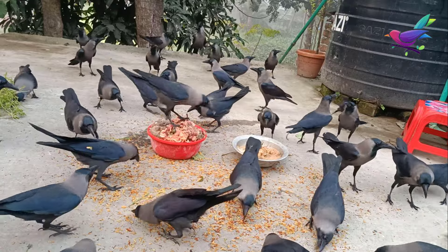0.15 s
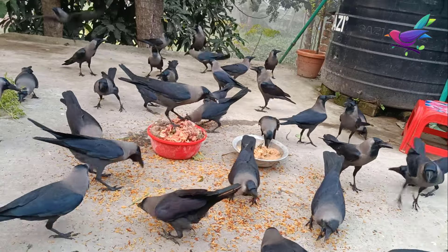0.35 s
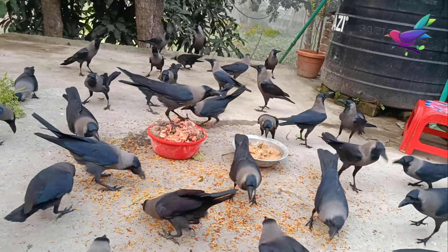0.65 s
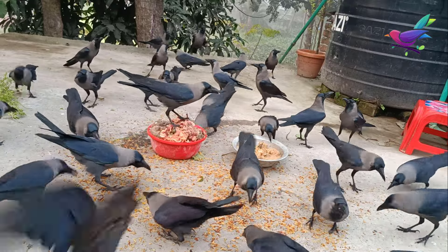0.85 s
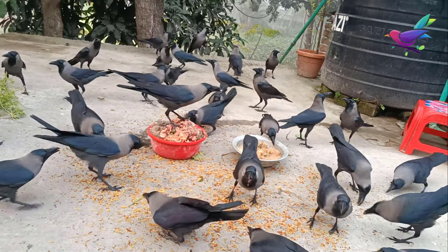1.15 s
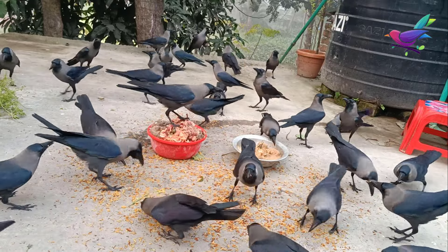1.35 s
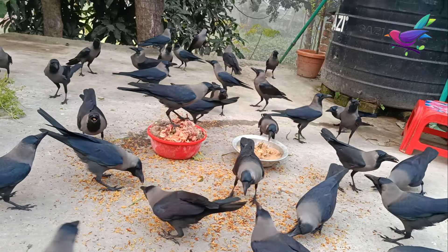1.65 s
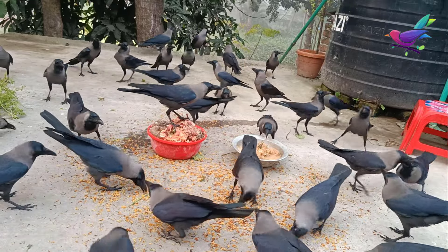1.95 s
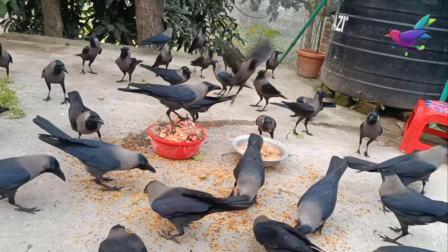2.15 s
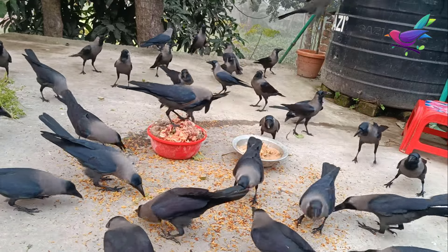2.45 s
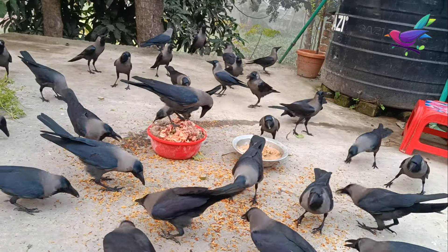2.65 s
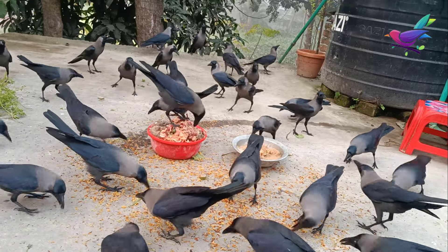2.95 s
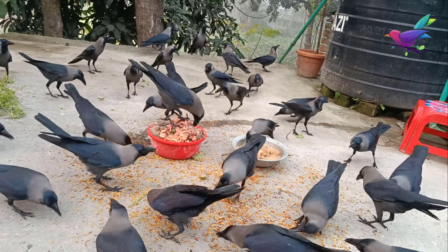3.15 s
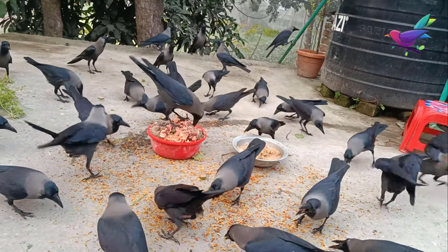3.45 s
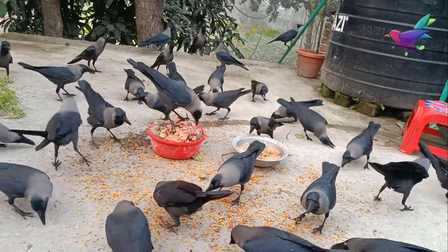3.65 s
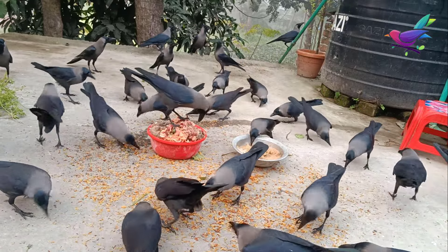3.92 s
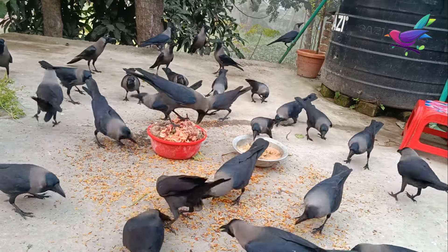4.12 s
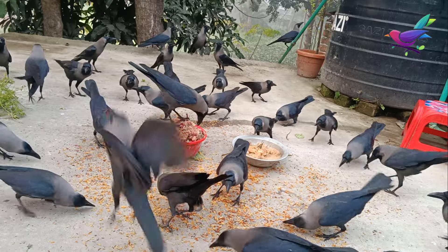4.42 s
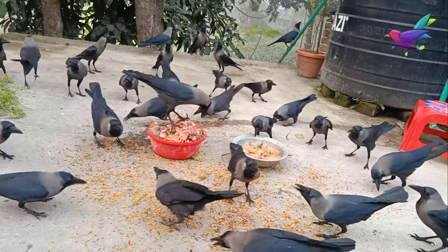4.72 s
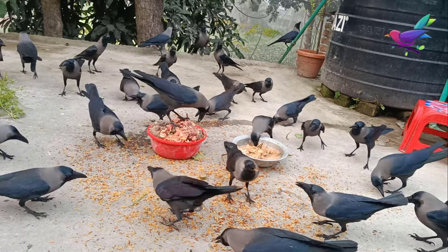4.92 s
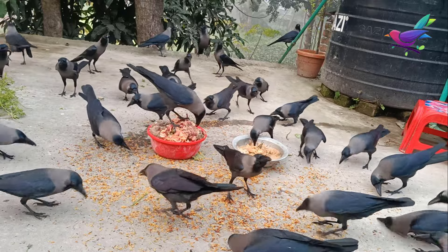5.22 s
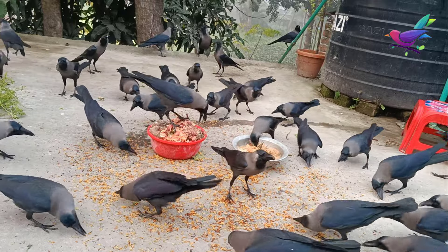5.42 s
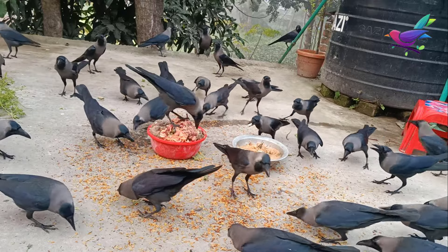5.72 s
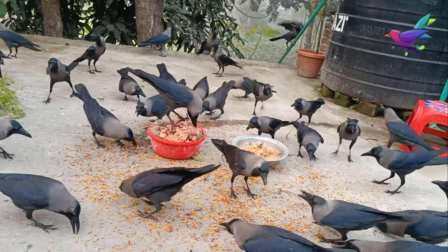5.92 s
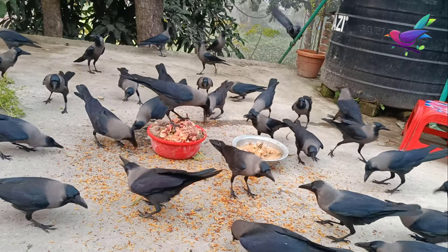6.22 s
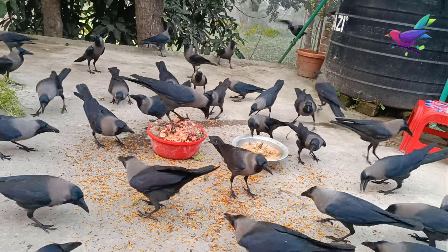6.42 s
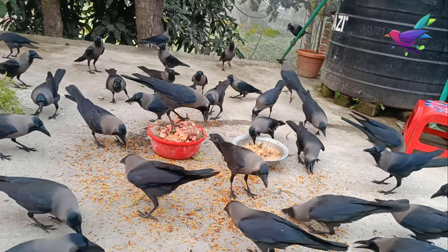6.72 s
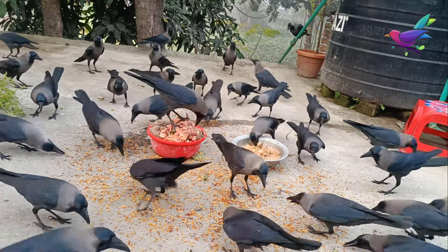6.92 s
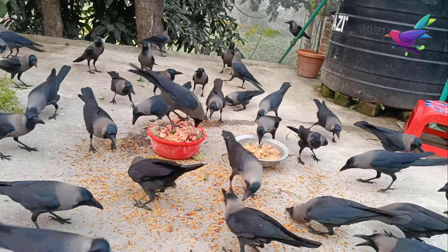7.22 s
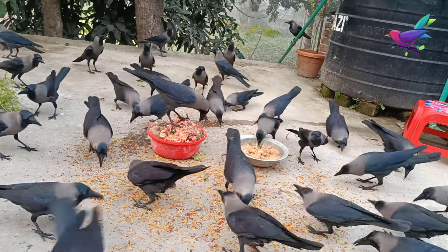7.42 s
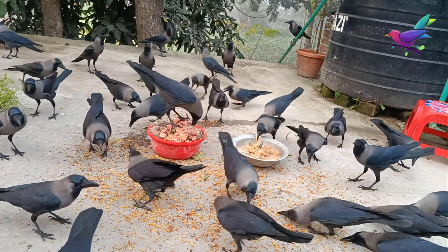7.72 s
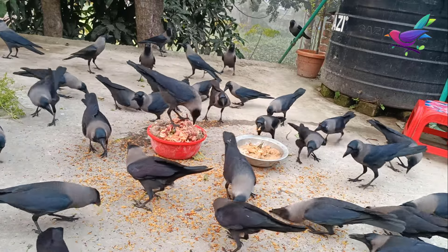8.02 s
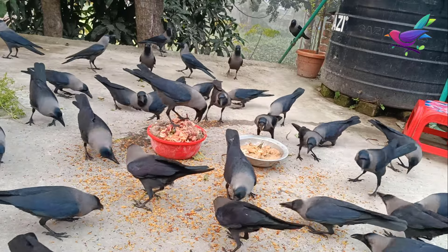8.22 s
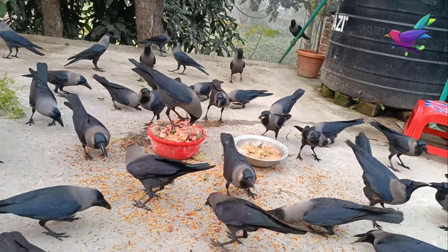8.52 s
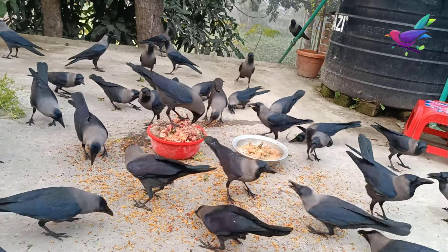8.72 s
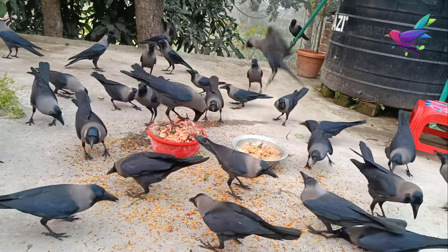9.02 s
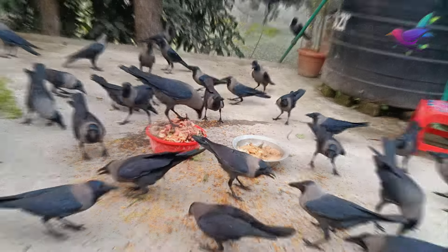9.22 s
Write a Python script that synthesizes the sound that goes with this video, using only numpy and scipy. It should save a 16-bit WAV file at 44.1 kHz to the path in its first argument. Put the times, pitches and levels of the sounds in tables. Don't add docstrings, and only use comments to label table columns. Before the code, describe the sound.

A crowd of crows caws harshly and hoarsely over each other in a yard, with wing thumps, small knocks and beak ticks.

```python
import sys
import numpy as np
from scipy import signal
from scipy.fft import rfft, irfft
from scipy.io import wavfile
from scipy.ndimage import uniform_filter1d

SR = 44100
rng = np.random.default_rng(int(sys.argv[2]) if len(sys.argv) > 2 else 0)


def master_out(mix):
    frames = np.transpose(np.atleast_2d(mix))
    ceiling = np.clip(frames, -1, 1)
    pcm = np.round(ceiling * 32767).astype(np.int16)
    wavfile.write(sys.argv[1], SR, pcm)


def decibels_to_gain(level_db):
    exponent = np.asarray(level_db, float) / 20
    return 10 ** exponent


N = 413216
TIME = np.arange(N) / SR


def unit(x):
    return x / np.sqrt(np.mean(x ** 2))


def walk(count, rate):
    k = int(SR / rate) + 1
    steps = np.repeat(rng.standard_normal(count // k + 1), k)[:count]
    return unit(uniform_filter1d(steps, k))


def colour(x, points):
    hz, db = np.transpose(points)
    bins_hz = np.arange(N // 2 + 1) * SR / N
    return irfft(rfft(x) * decibels_to_gain(np.interp(np.log(bins_hz + 1), np.log(hz), db)), N)


def band(x, lo_hz, hi_hz, order=4):
    return signal.sosfiltfilt(signal.butter(order, [lo_hz, hi_hz], "band", fs=SR, output="sos"), x)


def swell(x, db, hold_s):
    running = np.sqrt(uniform_filter1d(np.mean(x, axis=0) ** 2, int(hold_s * SR)) + 1e-12)
    return x * decibels_to_gain(db) / running


def add(out, sound, at_s, late_ms, pan_db):
    for side, sign in enumerate((1, -1)):
        i = int((at_s + sign * late_ms / 2000) * SR)
        part = sound[max(-i, 0):max(N - i, 0)]
        out[side, max(i, 0):max(i, 0) + len(part)] += part * 2 / (1 + decibels_to_gain(-sign * pan_db))


# frequency in Hz, level in dB per Hz.
YARD = [(15, -35), (25, -0.5), (193, -8), (322, -14.5), (399, -13), (871, -16), (2630, -26), (12800, -40),
        (15500, -64)]


def yard():
    mid, side = rng.standard_normal((2, N))
    side = band(side, 560, 19000, order=1)
    air = unit(colour(np.array([mid + side, mid - side]), YARD))
    return air * decibels_to_gain(-43.5 + 2.5 * walk(N, 8))


# start in seconds, length in seconds, level in dB, # share above 150 Hz in
# dB, left minus right in dB.
GUSTS = [(0.544, 0.034, -41.5, -32.5, 7), (0.937, 0.036, -43.5, -11, 0), (1.33, 0.069, -30.5, -2, 3),
         (1.557, 0.048, -17.5, -1, 18), (1.645, 0.12, -21, -9, 6.5), (1.923, .02, -28, -8.5, -10),
         (2.126, 0.15, -20.5, -4.5, 21), (2.346, 0.21, -28, -38, -7), (2.797, 0.079, -35.5, -9, -4),
         (3.974, 0.044, -30.5, -38, -25), (4.214, 0.034, -28.5, -39, 0), (4.407, 0.19, -26, -49, -19),
         (4.69, 0.035, -37, 4, -5), (5.914, 0.0045, -17.5, -2, 36), (5.975, .02, -24.5, -6.5, 30),
         (6.03, .05, -23, -8, 30), (6.124, 0.087, -29, -2, 11), (7.097, 0.12, -42.5, 2, -4),
         (.33, .1, -43, -3, 0), (0.676, .06, -44, -2.5, -2), (1.78, 0.074, -35, -11, 0),
         (3.116, 0.14, -45, -7, -4), (3.525, .06, -41.5, -4.5, -1), (4.532, 0.056, -31.5, -3.5, -10),
         (6.618, 0.06, -45, -10, 0), (8.0, 0.075, -51, -3, -2), (8.694, 0.018, -52, -31, -4)]


def gusts():
    rise_db_per_s, fall_db_per_s = 242, 149
    breeze_db, breeze_knock_db = -60, -1
    lumps = decibels_to_gain(4.9 * np.array([walk(N, 30), walk(N, 30)]))
    rumble = unit(band(lumps * rng.standard_normal((2, N)), 26, 72.4, order=1))
    thumps = unit(band(lumps ** 1.79 * rng.standard_normal((2, N)), 91, 308, order=2))
    power = np.full((2, N), decibels_to_gain(2 * breeze_db) / 2)
    sharp = power * decibels_to_gain(2 * breeze_knock_db)
    for start, length_s, db, knock_db, pan_db in GUSTS:
        before_db = rise_db_per_s * (start - TIME)
        after_db = fall_db_per_s * (TIME - start - length_s)
        fade_db = np.maximum(before_db, after_db).clip(0)
        left = 1 / (1 + decibels_to_gain(-2 * pan_db))
        push = decibels_to_gain(2 * (db - fade_db)) * np.array([[left], [1 - left]])
        power = power + push
        sharp = sharp + push * min(decibels_to_gain(2 * knock_db), .9)
    both = np.sqrt(power - sharp) * rumble + np.sqrt(sharp) * thumps
    return swell(both, 10 * np.log10(power.sum(axis=0)), hold_s=0.074)


# time in seconds, pitch in Hz, level in dB.
WHISTLES = [
    [(6.71, 3760, -60), (6.78, 3680, -56), (6.86, 3730, -54), (6.9, 3690, -62)],
    [(7.0, 2930, -64), (7.025, 3060, -60), (7.055, 2980, -64)],
    [(7.095, 3180, -56), (7.13, 3090, -60), (7.22, 3090, -63)],
    [(7.125, 3020, -58), (7.15, 2870, -54), (7.19, 2760, -54), (7.24, 2820, -58)],
    [(7.92, 3250, -54), (7.955, 2950, -56)],
    [(8.02, 3300, -55), (8.05, 3000, -57)],
    [(5.97, 2500, -69), (6.1, 3400, -68)],
    [(5.89, 2950, -73), (6.02, 3400, -72)],
    [(8.59, 3900, -52), (8.627, 4040, -43), (8.643, 3350, -45), (8.66, 2870, -45), (8.71, 2700, -50)],
    [(9.0, 3480, -60), (9.04, 3640, -58), (9.07, 3720, -47), (9.088, 3400, -45), (9.105, 2850, -48),
     (9.155, 2650, -52)],
]


def songbird():
    out = np.zeros((2, N))
    for note in WHISTLES:
        s, hz, db = np.transpose(note)
        t = np.arange(s[0], s[-1], 1 / SR)
        edge = np.minimum(np.minimum(t - s[0], s[-1] - t) / 0.0025, 1)
        pitch_hz = np.interp(t, s, hz) * (1 + .007 * walk(SR, 120)[:len(t)])
        level_db = np.interp(t, s, db) + 4 * walk(SR, 70)[:len(t)]
        tone = np.sin(np.cumsum(pitch_hz) * 2 * np.pi / SR) * decibels_to_gain(level_db) * edge
        add(out, tone * decibels_to_gain(7.5), s[0], 0, 0)
        add(out, tone * decibels_to_gain(-6), s[0] + .009, -.3, 0)
    return out


# start in seconds, length in seconds, centre in Hz, level in dB, left minus right in dB.
SWISHES = [(1.866, 0.22, 10800, -42.5, 20), (3.398, .12, 12000, -46, 5), (4.46, 0.079, 11000, -47, 0),
           (4.76, 0.14, 9850, -42, 6), (5.977, 0.055, 6000, -67, -4), (6.025, 0.035, 7040, -58, -13),
           (6.905, 0.04, 1610, -40, -2), (6.902, 0.058, 8000, -45, 0), (4.677, 0.14, 900, -37, 4),
           (5.227, .02, 1500, -49, 0), (6.121, 0.043, 2500, -39, -7), (7.013, 0.017, 2000, -51, 0),
           (7.068, 0.052, 1500, -39, -2), (8.472, 0.029, 4350, -42, -8), (6.88, .015, 3000, -44, 0),
           (9.04, 0.11, 12000, -60, 0)]


def wings():
    out = np.zeros((2, N))
    for at_s, length_s, centre_hz, db, pan_db in SWISHES:
        count = int(length_s * SR)
        rough = rng.standard_normal(SR // 2) * decibels_to_gain(4.3 * walk(SR // 2, 142))
        air = unit(band(rough, 0.12 * centre_hz, 1.05 * centre_hz, order=2))
        stroke = np.sin(np.pi * (np.arange(count) / count) ** 0.73)
        add(out, decibels_to_gain(db) * air[:count] * stroke, at_s, .1, pan_db)
    return out


# start in seconds, peak in dB, left minus right in dB.
KNOCKS = [(0.799, -29, -5), (1.35, -29, -1), (1.478, -29, -4), (1.689, -32, 2), (1.725, -34, 0),
          (2.83, -33, -3), (3.125, -31, -1), (3.165, -37, 0), (6.399, -42, 0), (7.27, -36, 0),
          (4.718, -37, 10), (5.226, -57, 0.5), (5.891, -26.5, 34), (5.919, -32, 28), (6.129, -37.5, -6),
          (7.021, -54, -2.5), (7.075, -44, -6)]


def knocks():
    out, t = np.zeros((2, N)), np.arange(4000) / SR
    for at_s, db, pan_db in KNOCKS:
        push = (1 - np.exp(-t / 0.0015)) * np.exp(-t / .012)
        blow = band(rng.standard_normal(len(t)) * push, 316, 770, order=2)
        add(out, decibels_to_gain(db + 7.0) * blow / blow.max(), at_s, 0, pan_db)
    return out


# start in seconds, peak in dB, lower band above it in dB,
# left minus right in dB.
PECKS = [(1.8836, -33, -7, 6.5), (3.656, -51.5, 15, -15), (4.298, -52, -1, -5), (4.488, -42, 1, -5),
         (4.6649, -34.5, -42, -0.5), (4.7681, -54, 2, 6.5), (4.775, -58, -6, 9), (4.786, -37, -11, -9),
         (5.1335, -50, 0, 1.5), (5.9673, -59, 3, -1), (5.996, -49.5, 4, -3), (6.054, -43, -8, 6),
         (6.0975, -53, -9, 3), (6.6347, -43.5, 1, -1.0), (6.915, -52.5, 8, -14), (6.9556, -36.5, -14, 11),
         (7.0645, -49, -6, 2), (7.1172, -56, 5, -2.5), (7.1297, -37, -7, -12), (7.289, -40, -8, -2),
         (7.7772, -32.5, -21, 1), (8.0072, -37, -7, -5), (8.485, -42, -3.5, -16), (8.6235, -34, -12, 11),
         (9.0663, -40, -4, -0.5), (9.149, -53, 5, -3)]


def pecks():
    out, t = np.zeros((2, N)), np.arange(900) / SR
    for at_s, db, low_db, pan_db in PECKS:
        crack = rng.standard_normal(len(t)) * (np.exp(-t / 0.00082) + 0.41 * np.exp(-t / 0.017))
        high = band(crack, 7900, 15200, order=2)
        low = band(crack, 4830, 7400, order=2)
        tick = high / high.max() + decibels_to_gain(low_db + 14.5) * low / low.max()
        add(out, decibels_to_gain(db - 0.5) * tick, at_s, 0, pan_db)
    return out


OVERTONES_DB = [-26.5, -3, 0, 5.5, -0.5, 2]


def caw(length_s, top_hz, sag, hoarse, ring):
    count = int(length_s * SR)
    u = np.arange(count) / count
    flutter, drift, jitter = (hoarse * walk(SR, rate)[:count] for rate in (60, 30, 700))
    arch = 1 - .18 * np.exp(-u / .12) - sag * u ** 1.6 - .45 * np.exp((u - 1) / .04)
    arch /= arch.max()
    flap_hz = rng.uniform(69, 79) * arch ** .5 * (1 + .04 * flutter)
    flap = np.cumsum(flap_hz) * 2 * np.pi / SR
    slack = min(4 * hoarse, 1)
    bend = slack * .045 * np.sin(flap + 1)
    hz = top_hz * arch * (1 + bend + .012 * drift + .011 * jitter)
    phase = np.cumsum(hz) * 2 * np.pi / SR

    overtones = np.arange(1, 28)[:, None]
    uneven_db = np.minimum(0.29 * overtones, 2) * rng.standard_normal(overtones.shape)
    strength_db = np.interp(overtones, np.arange(6) + 1, OVERTONES_DB) + uneven_db
    for at_hz, db, width_hz in zip(ring[::2], ring[1::2], (306, 450, 290)):
        strength_db = strength_db + db * np.exp(-((overtones * top_hz - at_hz) / width_hz) ** 2)
    opening = 1 + np.where(overtones < 7, .72, .35) * slack * np.sin(flap)
    waves = np.cos(overtones * phase + 7 * rng.random(overtones.shape))
    tone = np.sum(opening * decibels_to_gain(strength_db) * waves, axis=0)
    breath = .2 * hoarse * rng.standard_normal(SR)[:count]
    effort = decibels_to_gain(-2.5 * (2 * u - 1) ** 2)
    edges = np.minimum(u / 0.026, 1) * np.minimum((1 - u) / 0.092, 1)
    return (unit(tone) + breath * opening[-1]) * effort * edges


# start in seconds, length in seconds, top pitch in Hz, sag at the end from 0 to 1, level in dB.
WALL = [(.379, 0.27, 439.7, 0.04, -22), (1.099, 0.3, 440.3, 0, -25), (1.88, 0.25, 575.7, 0.5, -20.5),
        (2.081, 0.33, 439.2, 0.04, -20.5), (3.099, 0.36, 452, 0.17, -24.5), (3.871, 0.35, 437, .08, -24.5),
        (4.765, 0.36, 438, 0.04, -21.5), (5.549, 0.29, 442, 0.01, -26.5)]
FENCE = [(.101, 0.45, 448.5, 0.1, -18.5), (.62, 0.28, 446.6, 0.057, -22), (.902, 0.36, 456, 0.045, -21),
         (1.33, 0.25, 453.4, 0.091, -18.5), (1.829, 0.26, 452, 0.13, -18.5), (3.172, 0.28, 511, .17, -23.5),
         (3.9, 0.3, 489, 0.18, -26.5), (5.571, 0.26, 527.6, 0.2, -26)]
BOWL = [(2.5, 0.32, 431.7, 0.081, -23.5), (2.84, 0.23, 503.3, 0.036, -24.5),
        (3.619, 0.36, 513.4, 0.15, -28.5), (4.799, 0.27, 531, 0.11, -26), (7.334, 0.25, 523.4, 0.0076, -21),
        (8.97, 0.43, 444, 0.2, -30)]
TREE = [(.85, 0.3, 507, 0.14, -25), (4.78, .33, 440.4, 0.17, -33), (5.3, 0.43, 450, 0.16, -26),
        (6.199, 0.36, 407, .12, -29.5), (7.235, 0.42, 415, 0.17, -28.5), (7.15, 0.35, 440, 0.03, -42),
        (7.77, .22, 465.3, 0.27, -31), (7.959, 0.42, 418.4, 0.099, -28.5), (8.551, 0.32, 428, 0.088, -31)]
POT = [(-.1, 0.34, 484, 0.18, -18.5), (.221, 0.29, 481, 0.09, -21.5), (.579, 0.42, 500, 0.049, -22.5),
       (1.25, 0.38, 508.7, 0.17, -21), (2.1, .37, 506, 0.12, -20.5), (2.47, 0.38, 502.4, 0.11, -22),
       (2.939, 0.39, 472.7, 0.082, -22), (5.283, 0.45, 502.6, 0.093, -25.5), (6.15, 0.53, 462, 0.13, -25.5),
       (6.38, 0.2, 519, 0.11, -23), (7.479, 0.3, 468, 0.099, -23.5), (7.97, 0.23, 481, 0.036, -29.5),
       (8.128, 0.39, 469, 0.16, -24), (9.18, 0.33, 461, 0.059, -31)]
TANK = [(1.5, .22, 468, .1, -35), (4.24, .14, 460, 0, -49), (3.658, 0.2, 440, 0.014, -33),
        (6.95, 0.21, 464, 0.066, -43), (7.548, 0.22, 405.3, 0.096, -27.5), (8.498, 0.34, 477, 0.023, -25.5),
        (8.781, 0.25, 446.6, 0.11, -24), (8.93, 0.45, 545, 0.16, -25)]
HEDGE = [
    (1.691, 0.21, 529, 0.078, -21.5),
    (7.76, .3, 470.8, 0.062, -30.5),
]
ROOF = [
    (3.382, .28, 481.3, .21, -21.5),
]
POST = [
    (4.39, .33, 415.3, .17, -27.5),
]
GATE = [
    (6.625, 0.17, 487, 0.0564, -28),
    (8.98, .42, 484, 0.045, -27),
]
# its caws,
# left port late by ms, left minus right in dB, throat in dB, rasp in dB.
PERCHES = [
    (WALL, -.48, -0.3, 8.1, 10.7),
    (FENCE, -.35, -0.43, 4.2, 11.4),
    (BOWL, -.21, -1.9, 6.2, 9.7),
    (TREE, .03, -1.8, 6.96, 13.05),
    (POT, .23, -4.5, 5.6, 13.74),
    (TANK, 0.41, -4.5, 6.5, 13),
    (HEDGE, .03, -1, -9, 13.3),
    (ROOF, -.1, -2.9, 3, 11),
    (GATE, .3, -2, 7.6, 13.4),
    (POST, -.1, -2.6, 5.2, 12.5),
]
# low ring in Hz, its dB, high ring in Hz, its dB,
# perhaps a dip in Hz, its dB.
RINGS = [(1984, 3.5, 4070, 2.5), (1990, 4.3, 4270, 3), (2090, 4.9, 4270, 7), (1780, 1.3, 5030, 7.5),
         (1850, 7.5, 4610, 4.5), (1840, 4, 5700, 2), (1750, 4.5, 4400, 6.5), (2300, 6.8, 4300, 17),
         (2360, 15, 5500, 5.6), (2082, 12.5, 4130, 15, 800, -21)]
# time in seconds, hoarseness from 0 to 1.
HOARSE = [(0, .8), (1.7, .8), (2.4, .45), (3.2, .4), (3.38, .14), (3.6, .28), (4.4, .25), (4.8, .3),
          (5.3, .45), (6.3, .45), (6.65, 1), (6.9, .3), (7.3, .5), (8.2, .45), (9, .8)]
# frequency in Hz, level in dB per Hz.
VOICE = [(300, -9.5), (620, 5.5), (780, 5), (1050, 5.5), (1350, 6.5), (1850, 8), (2200, 5), (2500, -8),
         (3350, -20.5), (4100, -23.5), (6600, -22), (8200, -36), (13000, -49), (15500, -24)]


def crows():
    near, far = np.zeros((2, N)), np.zeros((2, N))
    edges_hz = [210.7, 430, 1150, 1290, 3450, 3850]
    for (caws, late_ms, pan_db, throat_db, rasp_db), ring in zip(PERCHES, RINGS):
        perch = np.zeros((2, N))
        for start, length_s, top_hz, sag, db in caws:
            hoarse = np.interp(start, *np.transpose(HOARSE))
            add(perch, decibels_to_gain(db) * caw(length_s, top_hz, sag, hoarse, ring), start, late_ms, pan_db)
        facing_db = [throat_db - 12, throat_db, throat_db, 0, 0, rasp_db]
        near += colour(perch, list(zip(edges_hz, facing_db)))

    for start in np.arange(-.2, 9.4, .14):
        answer = caw(.35, rng.uniform(400, 530), 0.11, 0.81, RINGS[0])
        add(far, answer, start, rng.uniform(-0.48, 0.52), 0)
    shouting = uniform_filter1d(np.mean(near ** 2, axis=0), int(0.072 * SR))
    far *= np.sqrt(np.abs(shouting))

    echo_t60_s, echo_db, far_db = 0.14, -9, -18
    t = np.arange(SR // 2) / SR
    tail = rng.standard_normal((2, len(t))) * decibels_to_gain(-60 * t / echo_t60_s) * (t > .003)
    tail /= np.sqrt(np.sum(tail ** 2, axis=1, keepdims=True))
    wet = signal.fftconvolve(decibels_to_gain(echo_db) * near + decibels_to_gain(far_db) * far, tail, axes=1)[:, :N]
    return colour(near + wet, VOICE)


def scene():
    return yard() + gusts() + songbird() + wings() + knocks() + pecks() + crows()


def roll_off(x):
    return signal.sosfilt(signal.butter(12, 15730, fs=SR, output="sos"), x)


def record(dry):
    wind_hz, duck_from_db, hold_s = 250, -29, 0.16
    wind = signal.sosfiltfilt(signal.butter(2, wind_hz, fs=SR, output="sos"), dry)
    rumble = np.abs(uniform_filter1d(np.sum(wind ** 2, axis=0), int(hold_s * SR)))
    ducked = wind + (dry - wind) / (1 + rumble / decibels_to_gain(2 * duck_from_db)) ** 0.088
    return roll_off(ducked)


dry = scene()
out = record(dry)
master_out(out)
```